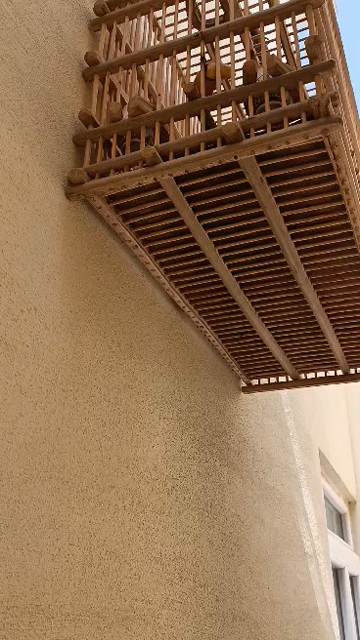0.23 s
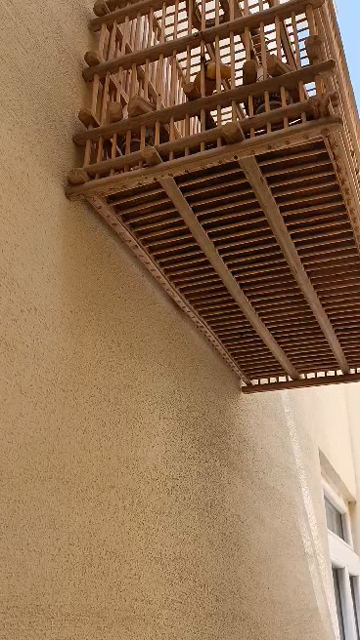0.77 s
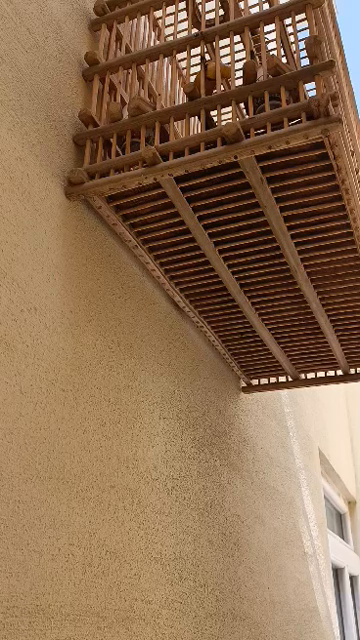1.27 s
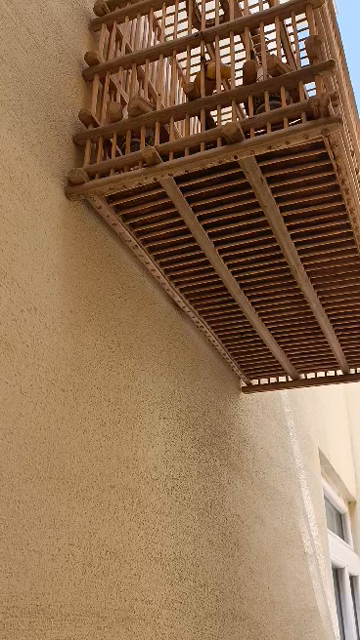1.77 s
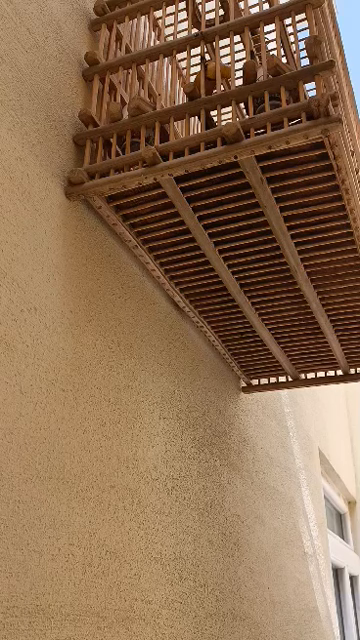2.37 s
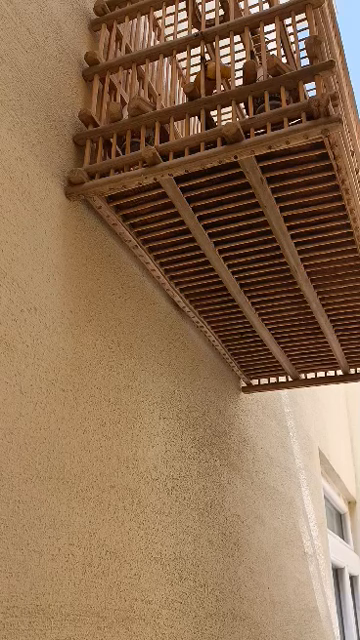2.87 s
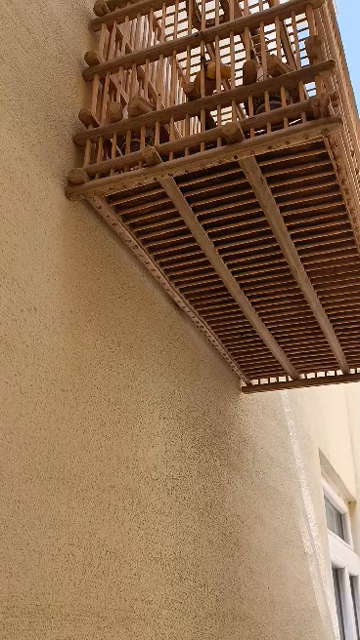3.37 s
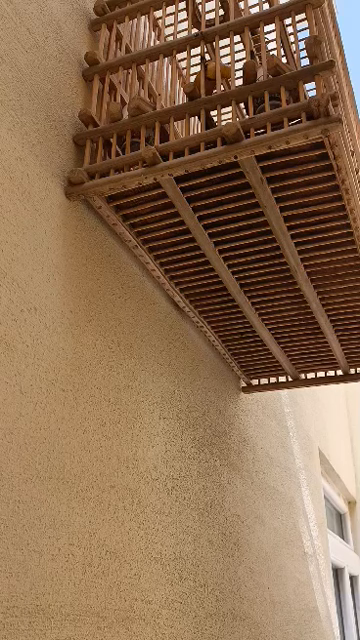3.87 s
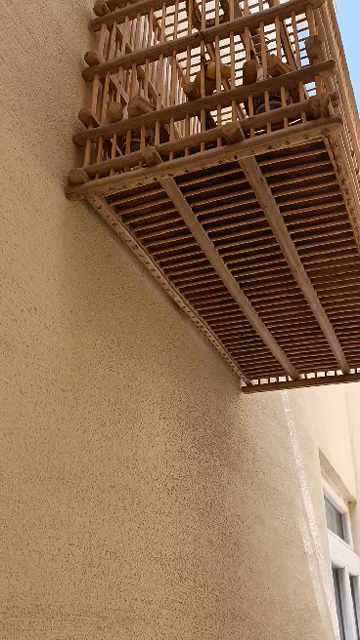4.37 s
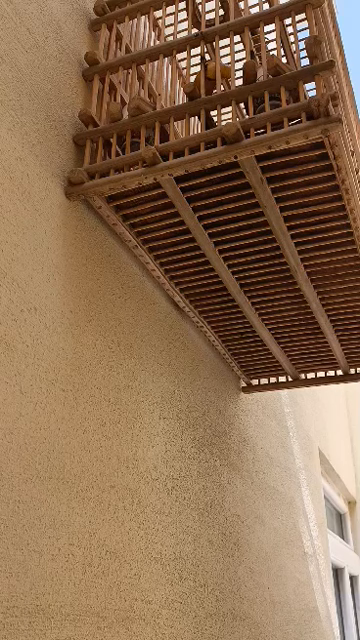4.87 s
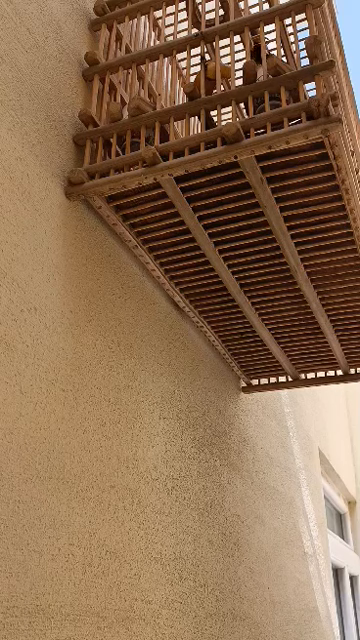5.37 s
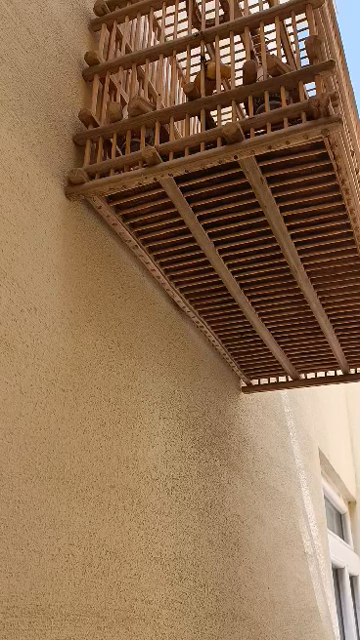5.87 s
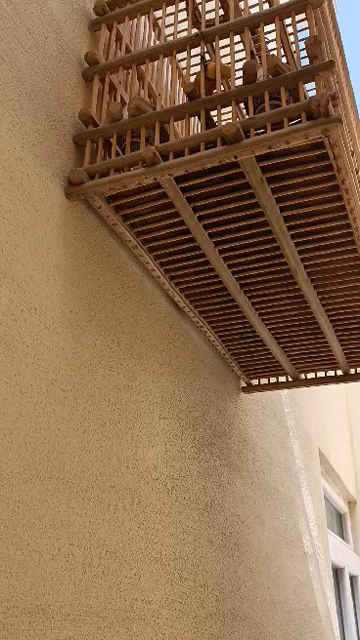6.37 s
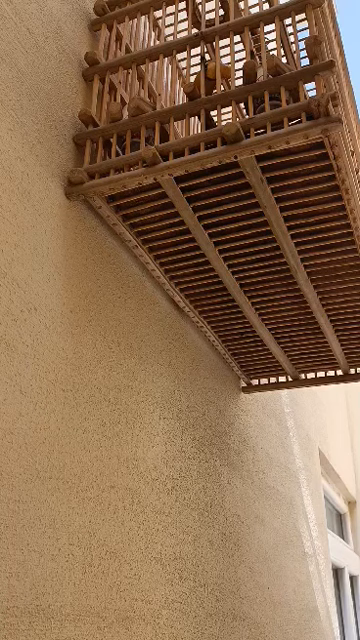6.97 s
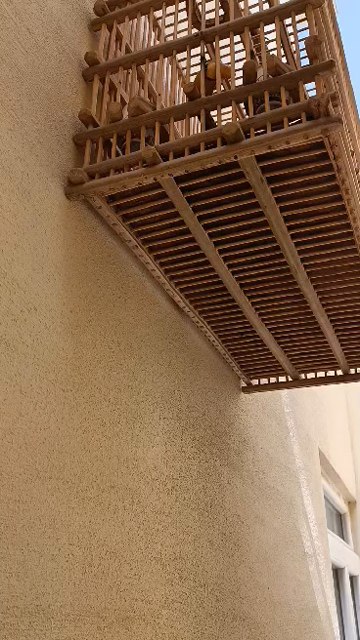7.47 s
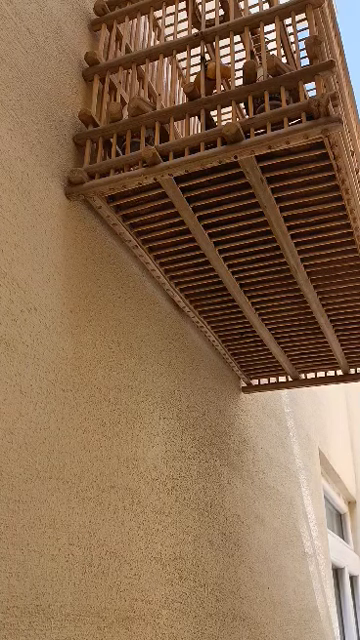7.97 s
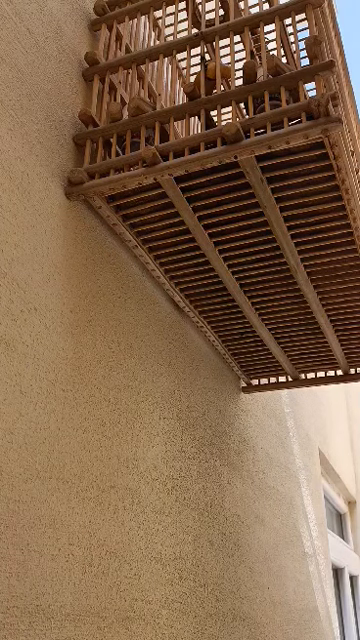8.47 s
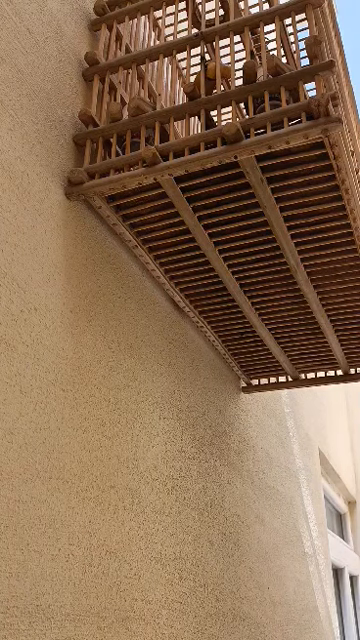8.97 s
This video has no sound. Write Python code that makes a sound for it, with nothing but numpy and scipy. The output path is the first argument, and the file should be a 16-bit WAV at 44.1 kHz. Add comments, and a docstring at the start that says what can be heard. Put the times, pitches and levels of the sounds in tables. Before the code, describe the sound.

In a quiet walled yard, a caged songbird starts with dry chips and a fast, raspy warble ending in three clearer notes. A shrill note leads into four bright whistled phrases, two high notes then lower ones. Wings rustle, claws tick and the cage thumps; more warbling, a liquid whistle run, chips, another shrill cry and two phrases follow. The bird is clear and slightly right, with a short tail; a distant engine hums faintly low.

```python
"""A far engine hums in a town background, falling slowly in pitch: two sine tones over shaped noise.
A bulbul in a wooden cage on a courtyard wall gives harsh chips, a scratchy warble, shrill notes and loud
whistled phrases: gliding partials, roughened by chaotic sidebands and filtered by the throat.
Midway it flutters to another perch in noise bursts and warbles again; a run of whistles follows, then
chips, a shrill note and more phrases. A decaying random response gives each cage sound the yard's tail."""
import sys
import numpy as np
from scipy import signal
from scipy.fft import rfft, irfft, next_fast_len
from scipy.io import wavfile
from scipy.ndimage import uniform_filter1d

SR = 44100
rng = np.random.default_rng(int(sys.argv[2]) if len(sys.argv) > 2 else 0)


def pcm_store(signal):
    """Save signal as 16-bit PCM."""
    levels = np.round(np.clip(np.atleast_2d(signal), -1, 1) * 32767)
    wavfile.write(sys.argv[1], SR, levels.astype(np.int16).T)


N = 406602
TIME = np.arange(N) / SR

# Repeats of the song motif; within a bout each comes lower and softer, and mostly slower.
# Each row: start in seconds, hesitation in seconds, pitch in Hz, level in dB,
# accent of the two lowest notes in dB.
PHRASES = [(2.844, 0, 2559, -12.5, 4), (3.277, 0.03, 2530, -14.5, 2.5), (3.747, .037, 2504, -16.5, 0.5),
           (4.229, .042, 2478, -17.5, 0), (8.551, .005, 2539, -13.5, 4.5), (8.988, .03, 2483, -15.5, -1.5)]


def from_db(db):
    """Amplitude gain is ten to the power of the decibels over twenty."""
    return 10 ** (np.asarray(db) / 20)


def rms_one(x):
    """Division by the root mean square gives a signal unit power."""
    return x / np.sqrt(np.mean(np.abs(x) ** 2) + 1e-20)


def at_hz(points, hz):
    """A spectral table is interpolated linearly over the logarithm of frequency."""
    table_hz, values = np.transpose(points)
    return np.interp(np.log(hz + 1e-3), np.log(table_hz), values)


def shaped(x, colour):
    """Linear filtering multiplies the spectrum by a gain, here from a (Hz, dB) table."""
    size = next_fast_len(N)
    gain = from_db(at_hz(colour, np.fft.rfftfreq(size, 1 / SR)))
    return irfft(rfft(x, size) * gain, size)[:N]


def coloured_noise(colour):
    """White noise through a filter takes the filter's spectrum; its power is set to one."""
    return rms_one(shaped(rng.standard_normal(N), colour))


def flutter(width_hz):
    """Low-passed noise is a random wobble of limited bandwidth, here of unit power."""
    lowpass = signal.butter(4, width_hz, fs=SR, output="sos")
    return rms_one(signal.sosfilt(lowpass, rng.standard_normal(N)))


def air(level_db=-58):
    """Interchannel correlation: the town background is alike on both sides in the bass, diffuse above."""
    # Each row: frequency in Hz, relative spectral density in dB per Hz.
    background_colour = [(20, -27), (34, -29.5), (47, -2), (60, -10.5), (95, 1), (140, -5), (230, -6.5),
                         (350, -11.5), (800, -14), (1600, -26), (3000, -28), (6000, -37), (13000, -45)]
    # Each row: frequency in Hz, left-right correlation from 0 to 1.
    likeness = [(40, 0.93), (120, 0.95), (300, 0.76), (700, 0.46), (2000, 0.041)]
    alike = np.clip(at_hz(likeness, np.fft.rfftfreq(N, 1 / SR)), -1, 1)
    mid = rfft(coloured_noise(background_colour)) * np.sqrt((1 + alike) / 2)
    side = rfft(coloured_noise(background_colour)) * np.sqrt((1 - alike) / 2)
    return from_db(level_db) * irfft([mid + side, mid - side], N)


def drone(hz, level_rows, waver_db):
    """Phase is the integral of frequency; a far tone's level wavers on its way through the air."""
    phase = 2 * np.pi * np.cumsum(hz) / SR
    level_db = np.interp(TIME, *np.transpose(level_rows)) + waver_db * flutter(4.6)
    return np.sqrt(2) * from_db(level_db) * np.sin(phase)


def hums(engine_db=-2.0, octave_db=0.0):
    """Harmonics keep their ratio: the engine's firing tone and its octave sink together as it loses speed."""
    # Each row: time in seconds, level of the firing tone in dB before engine_db.
    firing_level = [(0.0, -70), (0.07, -63), (1.34, -53), (1.64, -60), (4.11, -51), (4.7, -58), (5.21, -53),
                    (5.47, -56), (6.8, -49), (8.06, -65), (8.24, -56.5), (9.22, -46.5)]
    # The octave, heard only at first. Each row: time in seconds, level in dB before octave_db.
    octave_level = [(0.0, -78), (0.39, -60), (1.24, -86), (1.86, -61.5), (3.55, -76), (3.6, -94.5)]
    start_hz, sag_hz_per_s = 120.8, 1.6
    hz = start_hz - sag_hz_per_s * TIME
    firing = from_db(engine_db) * drone(hz, firing_level, waver_db=1.0)
    octave = from_db(octave_db) * drone(2 * hz, octave_level, waver_db=1.5)
    return firing + octave


def syrinx(notes, partials, rasp_hz, jitter, jitter_hz, hiss_db, bloom_db=0, whim=0, break_at=0.31):
    """Amplitude modulation by complex noise spreads gliding partials into chaotic sidebands, heard as rasp."""
    # Pitch gestures by name. Each row: share of the note from 0 to 1, pitch ratio, level in dB.
    gestures = { "dip": [(0, 1.17, -20), (.14, 1.02, -2), (.28, 1, -1), (.55, .98, -2), (.7, .77, -10),
                (.8, .99, -6), (.92, 1.04, -10), (1, 1.08, -22)], "hold": [(0, 1.12, -18), (.12, 1.02, -10),
                (.35, .97, -6), (.64, .98, 1), (.82, 1.04, -3), (1, 1.16, -18)], "scoop": [(0, 1.25, -16),
                (.15, 1.13, 0), (.33, .97, -3), (.5, .91, -4), (.72, 1.08, -2), (.88, .97, -6),
                (1, .85, -16)], "lift": [(0, .8, -12), (.18, .98, -1), (.5, 1.01, 0), (.8, 1.1, 0),
                (1, .66, -8)], "flat": [(0, .96, -12), (.12, 1.02, -1), (.7, .99, -2), (1, .95, -12)],
                "vee": [(0, .95, -20), (.25, 1, -2), (.45, .96, -5), (.7, .83, -5), (1, 1, -16)],
                "rise": [(0, .66, -16), (.3, .81, -2), (.6, .97, 0), (.85, 1, -1), (1, .99, -13)],
                "climb": [(0, .82, -10.5), (.2, .74, -1), (.38, .98, 2.5), (.88, 1, -2), (1, 1, -19)],
                "arch": [(0, .74, -12), (.25, .9, -2), (.55, 1, 0), (.8, .88, -3), (1, .74, -12)],
                "sweep": [(0, .48, -20), (.3, .7, -4), (.6, .86, 0), (.88, 1, 0), (1, 1.03, -12)],
                "fall": [(0, 1, -12), (.25, 1, 0), (.7, .92, -1), (1, .86, -10)], "sag": [(0, 1.08, -10),
                (.1, 1.05, -2), (.3, .93, -1), (.7, 1.02, 0), (.9, .97, -2), (1, .92, -12)],
                "crest": [(0, .88, -12), (.2, .95, -2), (.42, 1.06, 0), (.6, .99, 0), (.85, .96, -1),
                (1, .95, -10)], }
    # Air through the beak. Each row: frequency in Hz, relative spectral density in dB per Hz.
    hiss_colour = [(1500, 10.5), (4000, 13), (6000, 7), (8000, 4.5), (10200, 2), (13000, 1)]
    # An open beak lifts the upper partials and weakens the lowest.
    # Each row: multiple of the pitch, share of the beak opening (in dB) that it receives.
    beak = [(.5, -.4), (1, 0), (1.5, 1)]
    out, wobble, hiss = np.zeros(N), flutter(jitter_hz), coloured_noise(hiss_colour)
    chaos = rms_one(flutter(rasp_hz) + 1j * flutter(rasp_hz))
    for start, gesture, length, hz, level_db, rasp, open_db in notes:
        i = np.arange(int(start * SR), min(N, int((start + length) * SR)))
        share, ratio, swell_db = np.transpose(gestures[gesture])
        along = np.linspace(0, 1, len(i))

        # a note starts clean and breaks up as pressure builds
        pressure = (1 + np.tanh(10 * (along - break_at))) / 2
        rasp = np.clip(rasp, 0, 1) * pressure

        # each glide may be taken a little early or late
        hurry = np.exp(whim * rng.standard_normal())
        glide = uniform_filter1d(np.interp(along ** hurry, share, ratio), size=120)
        pitch = hz * glide * (1 + jitter * wobble[i])
        phase = 2 * np.pi * np.cumsum(pitch) / SR

        # where bloom is set, partials away from the main line grow with pressure
        onset_db = bloom_db * (pressure - 1)
        tone = 0
        for multiple, db in partials:
            beak_db = open_db * np.interp(multiple, *np.transpose(beak))
            partial_db = db + beak_db + onset_db * min(abs(multiple - 1), 1)
            tone = tone + from_db(partial_db) * np.exp(1j * multiple * phase)

        # clean and chaotic parts share the power
        voice = np.sqrt(2) * np.real(tone * (np.sqrt(1 - rasp) + np.sqrt(rasp) * chaos[i]))
        effort_db = level_db + np.interp(along, share, swell_db)
        effort = from_db(effort_db) * signal.windows.tukey(len(i), .1)
        out[i] += effort * (voice + from_db(hiss_db) * pressure * hiss[i])
    return out


def chips():
    """Wide noise sidebands and inharmonic partials make a short call harsh."""
    # Each row: start in seconds, gesture, length in seconds, pitch in Hz, level in dB, rasp from 0 to 1.
    calls = [ (0.080, "sweep", 0.032, 2980, -35, 0.99), (0.154, "sweep", 0.027, 3760, -32, 0.56),
             (0.538, "arch", 0.036, 2510, -34.5, 0.46), (0.625, "rise", 0.026, 3974, -28.5, 0.63),
             (2.437, "sweep", 0.062, 4017, -31, 0.4), (2.657, "rise", 0.034, 3213, -30, 0.3),
             (6.057, "climb", 0.028, 3926, -37, 1), (6.164, "climb", 0.033, 4400, -36.5, 0.8),
             (7.147, "sweep", 0.059, 4093, -29.5, 0.55), (8.128, "sweep", 0.056, 3728, -30, 0.9),
             (8.354, "rise", 0.02, 3320, -27.5, 0.5), ]
    # Each row: multiple of the pitch, level in dB.
    partials = [(0.6, -3.5), (1.001, 6), (1.347, -1.5), (2.004, -9), (2.806, -15)]
    notes = [(*row, 0) for row in calls]
    return syrinx(notes, partials, rasp_hz=680, jitter=0.014, jitter_hz=500, hiss_db=-3.5,
                  bloom_db=8.5, break_at=0.46)


def warble():
    """Period doubling in the syrinx adds half multiples of the pitch to the soft, scratchy notes."""
    # Each row: start in seconds, gesture, length in seconds, pitch in Hz, level in dB,
    # rasp from 0 to 1, beak opening in dB.
    notes = [ (.757, "rise", 0.029, 3255, -36, 0.4, -23), (.837, "rise", 0.022, 2975, -30, 0.9, -4),
             (.861, "fall", 0.019, 2583, -29.5, 0.26, 1.5), (.922, "rise", 0.025, 3103, -35, 1, -17),
             (.977, "sag", 0.076, 2523, -33.5, 0.95, -1), (1.077, "rise", 0.03, 3187, -31.5, 0.9, -6.5),
             (1.147, "sag", 0.063, 2400, -34.5, 0.3, 3), (1.262, "rise", 0.034, 3123, -30.5, 0.8, -1.5),
             (1.338, "rise", 0.023, 2726, -31, 0.84, 0), (1.370, "rise", 0.027, 3140, -32, 0.84, -7),
             (1.426, "fall", 0.034, 2675, -30.5, 0.8, 6), (1.548, "rise", 0.031, 3026, -32, 0.17, 4.5),
             (1.685, "rise", 0.025, 2730, -33.5, 0, -6), (1.764, "rise", 0.028, 2290, -39.5, 0.2, 0),
             (5.431, "rise", 0.047, 3067, -37.5, 0.02, -15), (5.597, "rise", 0.033, 2994, -34, 0.32, -13),
             (5.690, "rise", 0.032, 3062, -36.5, 0, -21), (5.787, "crest", 0.038, 2540, -34.5, 0.13, -7),
             (5.887, "rise", 0.022, 2670, -36, 0.06, 0), (5.908, "flat", 0.0133, 2664, -32.5, 0.1, 0),
             (5.992, "crest", 0.045, 2434, -38.5, 0.5, -6), (6.131, "rise", 0.024, 3040, -32, 0.1, -3),
             (6.287, "rise", 0.036, 3116, -34, 1, 2), (6.383, "rise", 0.034, 2510, -37.5, 0.4, -0.5),
             (6.422, "rise", 0.026, 2814, -42, 0.97, -4), (6.491, "rise", 0.033, 2577, -36, 0.6, -7),
             (6.571, "rise", 0.036, 2610, -31, 0.65, -1.5), (6.638, "fall", .023, 2940, -30, 0.4, -9.5),
             (6.697, "rise", 0.028, 2367, -37, 0.4, -2), ]
    # Each row: multiple of the pitch, level in dB.
    partials = [(.5, -10), (1, 0), (1.5, -4.5), (2, -19.5), (2.5, -21.5), (3, -29.5), (4, -41)]
    return syrinx(notes, partials, rasp_hz=270, jitter=0.016, jitter_hz=265, hiss_db=-14.5, whim=0.247)


def cadences():
    """Little rasp leaves clear tones: three notes near one pitch close each warble."""
    # Each row: delay in seconds, gesture, length in seconds, pitch in Hz, level in dB,
    # rasp from 0 to 1, beak opening in dB.
    closing_notes = [(0, "climb", 0.0328, 3020, -27, 0.18, -11),
                     (.046, "vee", 0.0254, 3003, -21, 0.07, -9.5),
                     (0.138, "rise", .033, 3030, -27.5, 0.11, 1)]
    # Each entry: start of a cadence in seconds.
    starts = [1.854, 6.778]
    # Each row: multiple of the pitch, level in dB.
    partials = [(.5, -17), (1, -3), (1.5, -10.5)]
    notes = [(start + delay, *note) for start in starts for delay, *note in closing_notes]
    return syrinx(notes, partials, rasp_hz=400, jitter=.005, jitter_hz=260, hiss_db=-17.5)


def shrills():
    """Inharmonic partials and strong pitch jitter give the shrill notes that grow out of a chip."""
    # Each row: start in seconds, gesture, length in seconds, pitch in Hz, level in dB, rasp from 0 to 1.
    cries = [(2.672, "crest", .055, 3422, -23.5, 0.2), (8.365, "crest", 0.055, 3430, -22.5, 0.28)]
    # Each row: multiple of the pitch, level in dB.
    partials = [(1, 3.5), (1.19, -4.5), (2.001, -15.5), (2.899, -19)]
    notes = [(*row, 0) for row in cries]
    return syrinx(notes, partials, rasp_hz=325, jitter=0.038, jitter_hz=295, hiss_db=-19, break_at=.1)


def whistle(notes):
    """A dominant fundamental over weak harmonics is heard as a pure whistle."""
    # Each row: multiple of the pitch, level in dB.
    partials = [(1, -1.5), (2, -29), (3, -35.5), (4, -34), (5, -35.5)]
    return syrinx(notes, partials, rasp_hz=487, jitter=0.0066, jitter_hz=300, hiss_db=-25.5)


def phrases():
    """Transposition scales every pitch alike: a motif of two high and four low whistles is repeated."""
    # Each row: delay in seconds, share of the hesitation from 0 to 1, gesture, length in seconds,
    # pitch ratio, level in dB, rasp from 0 to 1.
    motif = [(0, 0.01, "dip", .043, 1, 0, 0), (.095, .1, "hold", .04, 0.99, -1, 0),
             (0.168, .35, "rise", .012, .85, -17, 0), (.22, .5, "scoop", .04, .68, -12, 0),
             (.263, .55, "lift", .026, .795, -5.5, .15), (0.357, 1, "flat", 0.04, .664, -12.5, 0.04)]
    notes = []
    for phrase_start, hesitation, hz, phrase_db, accent_db in PHRASES:
        for delay, share, gesture, length, ratio, note_db, rasp in motif:
            start = phrase_start + delay + share * hesitation
            lowest = gesture in ("scoop", "flat")
            level_db = phrase_db + note_db + accent_db * lowest
            if start < TIME[-1]:
                notes.append((start, gesture, length, hz * ratio, level_db, rasp, 0))
    return whistle(notes)


def buzzes(delay_s=.075, length_s=0.018, hz=3376, rasp=0.25, against_phrase_db=-18):
    """Partials below the pitch roughen a short buzz between the two high whistles of each phrase."""
    # Each row: multiple of the pitch, level in dB.
    partials = [(0.502, -3.5), (0.749, 7.5), (1, -0.5), (2, -21), (2.999, -13.5)]
    notes = [(start + delay_s, "lift", length_s, hz, phrase_db + against_phrase_db, rasp, 0)
             for start, _, _, phrase_db, _ in PHRASES]
    return syrinx(notes, partials, rasp_hz=408, jitter=0.0096, jitter_hz=400, hiss_db=-29.0)


def flourish():
    """Rapid frequency glides join into one free, curling run of whistles between the two bouts."""
    # Each row: start in seconds, gesture, length in seconds, pitch in Hz, level in dB.
    run = [(7.411, "vee", 0.043, 1990, -15.5), (7.521, "scoop", 0.028, 1668, -23),
           (7.57, "arch", 0.014, 2310, -15.5), (7.586, "climb", 0.043, 2518, -18),
           (7.707, "fall", 0.0073, 2460, -17), (7.715, "arch", 0.028, 2020, -20),
           (7.743, "flat", 0.028, 1463, -31), (7.784, "fall", 0.012, 2482, -15.5),
           (7.813, "arch", 0.023, 2023, -19), (7.832, "rise", .018, 2466, -17.5)]
    return whistle([(*row, 0, 0) for row in run])


def song():
    """Source and filter: all the bird's voices leave through the resonances of one throat."""
    # Throat and beak pass 2-4 kHz best, with a second resonance near 10 kHz.
    # Each row: frequency in Hz, gain in dB.
    throat = [(300, -50.5), (750, -4), (1000, -2.5), (1800, -2.5), (3000, 0.5), (4200, -2.5), (5600, -4.5),
              (7300, -4), (8600, -13.5), (9800, -6), (11200, -13), (12600, -12.5)]
    voices = chips() + warble() + cadences() + shrills() + phrases() + buzzes() + flourish()
    return shaped(voices, throat)


def courtyard(x, near_t60=0.1, scatter_db=-.5, far_db=-1.02, build_s=0.007, right_lag=4):
    """Reverberation is convolution: direct sound, quick scatter from cage and wall, then the yard's tail."""
    # Each row: frequency in Hz, reverberation time (60 dB decay) in seconds.
    yard_t60 = [(500, 0.87), (2000, 0.54), (4000, 0.42), (8000, 0.5), (13000, 0.52)]
    t = np.arange(SR) / SR
    hz = np.fft.rfftfreq(SR, 1 / SR)
    near = rms_one(rng.standard_normal((2, SR)) * from_db(-60 * t / near_t60))

    # overlapping bands of noise, each with its own decay
    white = rfft(rng.standard_normal((2, SR)))
    centres = [row[0] for row in yard_t60]
    far = 0
    for band, (_, t60) in zip(np.eye(len(centres)), yard_t60):
        far = far + irfft(white * np.interp(hz, centres, band), SR) * from_db(-60 * t / t60)
    far = rms_one(far * (1 - np.exp(-t / build_s)))

    response = (from_db(scatter_db) * near + from_db(far_db) * far) / np.sqrt(SR)
    # the direct sound reaches the right channel right_lag samples later
    response[[0, 1], [0, right_lag]] += 1

    # the response is evened over neighbouring frequencies, so that steady whistles keep an even loudness
    spectrum = rfft(response, 2 * SR)
    local_power = uniform_filter1d(np.abs(spectrum) ** 2, size=160)
    even = irfft(spectrum / np.sqrt(local_power))[:, :SR]
    return signal.fftconvolve(x[None], even, axes=1)[:, :N]


def knock(start, level_db, t60):
    """Damping is exponential: a contact sets in suddenly, then dies away 60 dB in t60 seconds."""
    return (TIME >= start) * from_db(level_db - 60 * np.clip((TIME - start) / t60, 0, 2))


def wings(grain_db=7.0):
    """Random amplitude modulation makes swells of noise grainy, as rustling feathers are."""
    # Each row: start in seconds, length in seconds, level in dB before the grain.
    strokes = [(5.253, 0.12, -49.5), (5.554, 0.059, -50), (5.677, 0.055, -51), (5.728, 0.19, -48.5),
               (5.862, 0.19, -47)]
    # Each row: frequency in Hz, relative spectral density in dB per Hz.
    feather_colour = [(150, 3), (350, -1), (600, -6), (900, -8), (2000, -5.5), (7000, -12), (12000, -23)]
    swish = 0
    for start, length, db in strokes:
        swish = swish + from_db(db) * np.sin(np.pi * np.clip((TIME - start) / length, 0, 1)) ** 2
    return swish * from_db(grain_db * (flutter(88) - 1.0)) * coloured_noise(feather_colour)


def claws(t60=0.015):
    """Impacts on perch and bars are bursts of band noise with fast decay."""
    # Each row: start in seconds, level in dB, pitch in Hz.
    contacts = [(5.392, -37, 7600), (5.413, -43, 8500), (5.618, -36, 7000), (5.684, -25.5, 6000),
                (5.698, -32, 8500), (5.851, -48, 5000), (5.896, -44, 5500), (6.048, -39, 4000)]
    # Each row: multiple of the pitch, relative spectral density in dB per Hz.
    tick_colour = [(.5, -9), (1, -5), (2, -32)]
    ticks = 0
    for start, db, hz in contacts:
        ticks = ticks + knock(start, db, t60) * coloured_noise(np.array(tick_colour) * [hz, 1])
    return ticks


def landing(start_s=5.684, level_db=-43.5, t60=0.38, rattle_db=3.5):
    """An impact sets a structure ringing: the wooden cage thumps and rattles as the bird lands."""
    # Each row: frequency in Hz, relative spectral density in dB per Hz.
    wood_colour = [(100, -12), (220, -6), (400, 4.5), (650, 5), (1000, -16), (2000, -2.5), (6000, -22),
                   (13000, -36)]
    rattle = knock(start_s, level_db, t60) * from_db(rattle_db * flutter(70))
    return rattle * coloured_noise(wood_colour)


def scene(cage_db=1.0):
    """Level difference places the cage mostly a little to the right; the backgrounds add to it."""
    # Balance as the bird turns. Each row: time in seconds, left minus right in dB.
    facing = [(1.2, -1.5), (1.8, -2.5), (2.6, 0), (3.6, -2.5), (4.4, -3), (5.2, -2), (7.7, -2), (8.2, -1.5),
              (8.7, -1.5)]
    pan_db = np.interp(TIME, *np.transpose(facing)) / 2
    cage = courtyard(song() + wings() + claws() + landing())
    return cage * from_db(cage_db + np.array([pan_db, -pan_db])) + hums() + air()


def record(dry, cutoff_hz=13300):
    """An elliptic low-pass has a narrow transition band: the top is cut steeply."""
    lowpass = signal.ellip(12, .2, 80, cutoff_hz, fs=SR, output="sos")
    return signal.sosfilt(lowpass, dry)


dry = scene()
out = record(dry)
pcm_store(out)
```